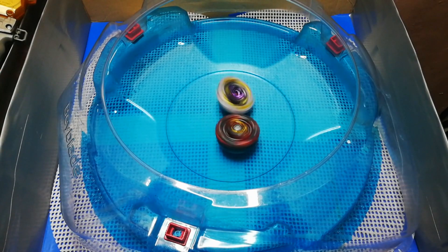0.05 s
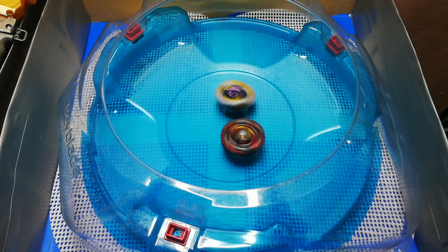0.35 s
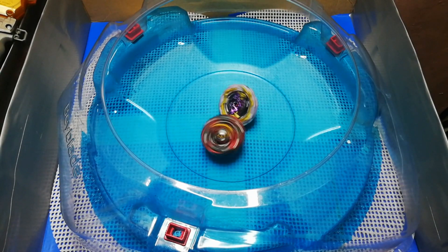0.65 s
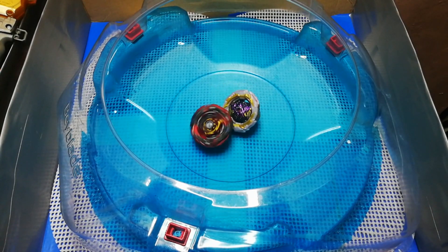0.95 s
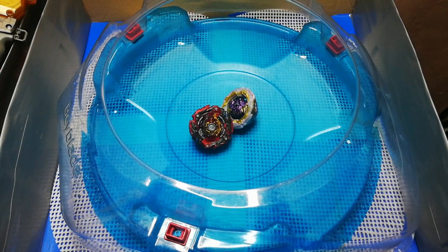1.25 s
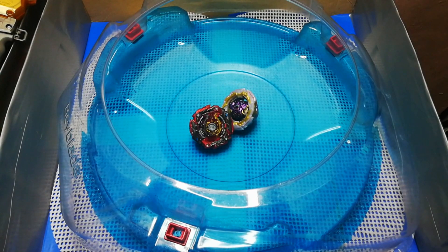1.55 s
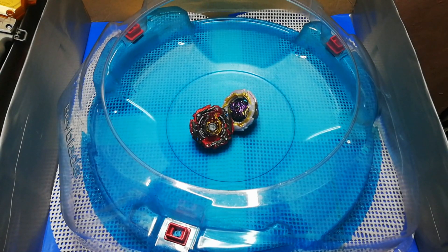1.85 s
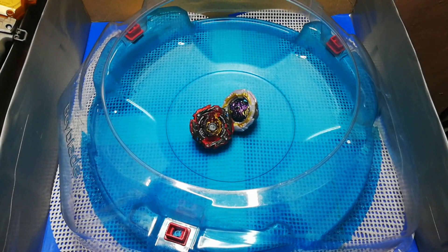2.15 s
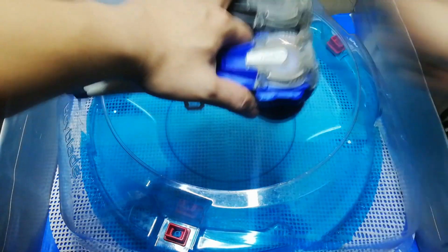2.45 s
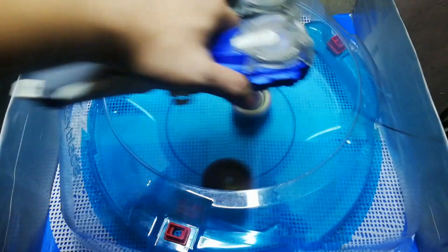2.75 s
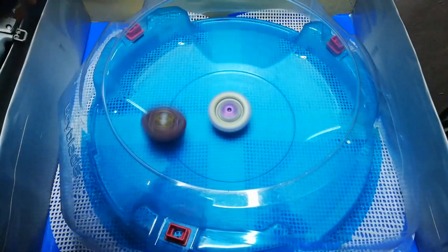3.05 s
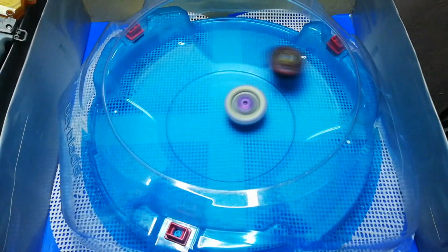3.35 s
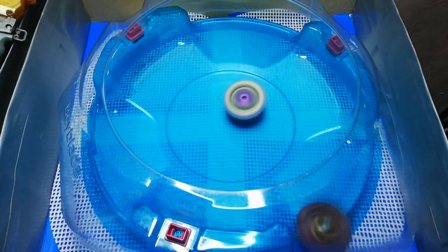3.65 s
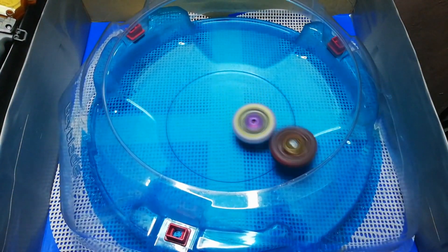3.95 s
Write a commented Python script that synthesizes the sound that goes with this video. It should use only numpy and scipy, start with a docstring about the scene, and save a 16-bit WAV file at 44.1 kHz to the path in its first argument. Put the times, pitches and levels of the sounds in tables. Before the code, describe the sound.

Spinning toy tops clack together close by in a plastic bowl for the first second, then die down to quiet room air. At about 2.4 seconds a ratchet launcher rips with a rising whine, snaps loudly at 2.6 and rewinds with a clicking rattle until 3.3. Fresh tops clatter in at 2.7 and whirr around, one slamming into the thin wall at about 3.5 and 3.7 seconds.

```python
"""Spinning tops in a plastic bowl

Two microphones close to a bowl that stands in a storage tub. Two tops clack together and die down.
A ratchet launcher is ripped and snaps at its stop; two fresh tops drop in while it rewinds and rattles.
One top whirrs round the bowl and slams twice into the thin wall. Behind it all, quiet room air."""
import sys
import numpy as np
from scipy import signal
from scipy.fft import rfft, irfft, next_fast_len
from scipy.io import wavfile
from scipy.ndimage import uniform_filter1d, map_coordinates

SR = 44100
rng = np.random.default_rng(int(sys.argv[2]) if len(sys.argv) > 2 else 0)


def put_to_file(sound):
    """Save the sound as 16-bit audio at rate SR, in the file named by the first command-line argument."""
    columns = np.atleast_2d(sound).T  # one column per channel
    safe = np.clip(columns, -1, 1)
    whole_steps = np.round(safe * 32767)
    wavfile.write(sys.argv[1], SR, whole_steps.astype(np.int16))


N = 176400

# The rims meet. Each row: start in seconds, level in dB, scrape t60 in seconds, bowl thump in dB.
CLACKS = [(0.027, -28, 0.026, -36.5), (.111, -15, 0.0084, -41.5), (.299, -32.5, 0.098, -40),
          (.3075, -29, 0.07, -42), (0.314, -23.5, .04, -27.5), (0.5525, -40, 0.019, -39),
          (0.581, -24, 0.034, -39), (.586, -22.5, 0.032, -24.5), (0.719, -42, .021, -47),
          (0.729, -26.5, .012, -31), (0.84, -39.5, 0.027, -44), (0.8572, -23.5, 0.02, -35.5),
          (.868, -27, 0.02, -31), (0.904, -24, .024, -30.5), (1.08, -45, 0.027, -39.5),
          (1.504, -50.5, 0.0087, -52)]
# The launcher's plastic parts click.
# Each row: start in seconds, level in dB, t60 in seconds, treble tilt in dB an octave.
CASE_CLICKS = [(2.391, -26.5, 0.014, 3.5), (2.401, -25.5, 0.011, 3), (2.44, -17, 0.013, 1),
               (2.464, -18, 0.021, 8.5), (2.548, -12, 0.022, 0), (2.6484, -0.5, 0.013, -2),
               (2.7523, -18.5, 0.045, -3), (2.82, -19.5, 0.015, -1), (2.857, -26, .014, 3),
               (2.889, -16.5, 0.044, 0.5), (2.931, -20, 0.04, 0), (2.938, -19, 0.027, 6),
               (2.969, -22, 0.028, 7), (2.996, -22, 0.049, 4), (3.025, -18, 0.06, -1),
               (3.036, -10, 0.017, 4), (3.044, -12, .012, 0), (3.053, -8, 0.012, 5), (3.069, -14, .014, -1),
               (3.0974, -5, 0.014, 1), (3.1008, -5.5, 0.019, -1), (3.1319, -5.5, 0.013, 2),
               (3.135, -5, 0.016, 1.2), (3.19, -15.5, 0.018, -2.5), (3.2284, -9.5, 0.011, -0.5),
               (3.251, -24, 0.018, -5.5)]
# The ratchet on the pull and rewind. Each row: time in seconds, level in dB, teeth a second.
PULL = [(2.33, -69, 90), (2.338, -44.5, 130), (2.41, -40, 218), (2.435, -28.5, 251), (2.458, -35, 275),
        (2.505, -30, 477), (2.53, -18, 635), (2.56, -21.5, 850), (2.59, -15.5, 1360), (2.626, -17, 1700),
        (2.642, -21.5, 1820), (2.66, -22.5, 1120), (2.672, -64, 1400)]
REWIND = [(2.64, -70, 1650), (2.66, -31, 1560), (2.73, -32, 1550), (2.81, -36.5, 1650), (2.87, -32, 1450),
          (3.04, -24.5, 2250), (3.16, -34, 2480), (3.27, -35.5, 2640), (3.3, -35, 3700), (3.36, -76, 1900)]
# The launcher is lifted away to the left. Each row: time in seconds, left over right in dB.
LAUNCHER_PATH = [(2.46, -2), (2.65, -3.5), (3.15, 3.5)]
# Fresh tops hop on the floor; the circling top strikes the wall.
# Each row: start in seconds, level in dB, t60 in seconds, bowl thump in dB.
LANDINGS = [(2.696, -18, 0.025, -15.5), (2.704, -14, 0.052, -36), (2.721, -16, 0.02, -37),
            (2.751, -19, 0.08, -40), (2.838, -24, 0.011, -19.5), (2.888, -12.5, 0.023, -44),
            (2.907, -24.5, 0.037, -21), (3.034, -20, 0.031, -42)]
CRASHES = [(3.344, -18, 0.049, -20.5), (3.484, -11.5, 0.053, -22.5), (3.49, -6, 0.028, -28.5),
           (3.619, -20.5, 0.016, -29), (3.721, -28, 0.1, -26.5), (3.735, -9.5, 0.042, -31.5),
           (3.745, -8.5, 0.043, -35), (3.756, -8.5, 0.028, -32)]
# The tips run on the bowl. Each row: time in seconds, rumble in dB, hiss in dB.
ROLL = [(0, -61.5, -65), (1.15, -56.5, -67), (1.35, -66, -68.5), (2.68, -63.5, -82), (2.72, -41.5, -35.5),
        (2.95, -33.5, -30.5), (3.15, -46.5, -49.5), (3.3, -37, -40), (3.43, -31.5, -38.5),
        (3.66, -48.5, -39.5), (3.88, -44, -37.5), (3.97, -34, -45)]

# The colour of each part at the microphones. Each row: frequency in Hz, relative level in dB.
RIM_COLOUR = [(240, -5.5), (400, -27), (697, -15), (852, -5), (1560, -2), (2220, -9.5), (2600, -5.5),
              (4180, -6), (9610, 2.5), (13700, -12), (16000, -27)]
GEAR_COLOUR = [(180, -69), (300, -31.5), (856, -22), (1210, -18), (2280, -11.5), (2840, -0.5), (3290, -7.5),
               (5080, -8), (8220, -21.5), (9390, -13.5), (13300, -20.5), (16000, -42)]
WHINE_COLOUR = [(400, -50), (650, -31), (1200, -9.5), (1750, -14), (2300, -36)]  # the gears' tone, sounded by the case
SLACK_CORD_COLOUR = [(590, -45), (1000, -21), (1610, -8), (2300, 2), (3840, -14), (4900, 0.5), (7880, -14),
                     (9280, -1), (16000, -43)]
SPOOL_COLOUR = [(290, -12.5), (500, -11.5), (784, -6), (946, -14), (2190, -0.5), (4800, -0.5), (5390, -7),
                (9630, -3), (13400, -14), (16000, -28)]
CASE_COLOUR = [(240, -47), (676, -40), (1600, -13.5), (2050, -11), (3530, -4.5), (6950, -5), (11800, -9.5),
               (16000, -26)]
GRIP_COLOUR = [(30, -2), (110, -9), (700, -41)]
THUMP_COLOUR = [(25, -22), (60, -7), (90, -8.5), (116, 7), (145, -5), (205, 0), (260, -2), (380, -12),
                (550, -15.5), (900, -30.5), (2500, -78)]
FLOOR_COLOUR = [(60, -22), (150, -4), (400, -1.5), (800, -10.5), (1500, -3.5), (2200, -19), (5000, -25)]
WALL_COLOUR = [(120, -43), (200, -18), (387, -10.5), (548, -22), (671, -11), (930, -9.5), (1080, -2),
               (1400, -9), (1750, -6.5), (2560, -11), (2800, -17.5), (3250, -10), (4040, -15), (9230, -16),
               (16000, -32.5)]
RUMBLE_COLOUR = [(18, -43), (102, 11), (229, 4), (351, 0.5), (475, -18.5), (800, -13), (1100, -64)]
TIP_COLOUR = [(290, -40), (500, 3), (1160, 0), (1380, -1), (2610, -6), (9920, -9), (14200, -23),
              (16000, -36)]
AIR_COLOUR = [(15, -56), (25, -6.5), (92, -10), (123, 2.5), (149, -15), (734, -15), (1160, -13),
              (1740, -13.5), (2990, -25), (7710, -36), (16000, -47)]
# Peaks and dips in those colours. Each row: centre in Hz, width in Hz, gain in dB.
RIM_MODES = [(7700, 250, 2.5), (9700, 240, -6.5)]
GEAR_MODES = [(1130, 180, 1.7), (1760, 170, 8.3), (2842, 240, 4.3), (4990, 370, 5.7), (8550, 1400, 9.4)]
SLACK_CORD_MODES = [(5000, 500, 7)]
CASE_MODES = [(1680, 160, 3.6), (2830, 180, 6.6), (6830, 92, 7.8), (9230, 900, 6.9)]
FLOOR_MODES = [(204, 27, 14.8), (391, 24, 9.6), (490, 200, 5), (1173, 125, 10.8), (1580, 280, 8.9)]
# Parts that ring when struck. Each row: frequency in Hz, relative level in dB, t60 in seconds.
PLASTIC_PING = [(3064, -41.5, 0.083), (5650, -46.5, 0.059)]
METAL_RING = [(11700, -44, .15), (12450, -50, .35)]
CASE_RING = [(2830, -9.5, 0.051), (3060, -9.5, 0.054)]
BOWL_RING = [(118.7, -6.5, .2), (205.6, -12.5, 0.12)]  # lowest modes, sounded by clacks near the centre
# The wall's hollow modes. Each row: frequency in Hz, dB for the side slam, dB for the front slam.
WALL_RING = [(391, -25, -34), (695, -22, -45), (830, -23, -30), (1010, -36, -13.5), (1073, -16.5, -39),
             (1101, -27, -20), (1256, -34, -20), (1405, -38, -24), (1600, -24, -28), (1774, -34, -23),
             (1890, -23, -32)]

# The tub's echoes. Each row: frequency in Hz, t60 in seconds.
TUB_DECAY = [(100, 0.086), (300, 0.35), (1000, 0.29), (5000, 0.25), (13000, 0.17)]
# How alike the microphones sound. Each row: frequency in Hz, correlation from 0 to 1.
MIC_LIKENESS = [(60, 1), (280, 0.94), (520, 0.04), (1100, 0.29), (3000, 0.17), (8000, 0.035)]
# The balance of the pair. Each row: frequency in Hz, left over right in dB.
MIC_BALANCE = [(100, 0), (550, -0.5), (2000, -1.5), (4500, -0.5), (8000, -2), (12000, -10.5)]

HARD_DB, BRIGHTEN = -29, 0.28  # clacks tilt up by BRIGHTEN dB an octave for each dB over HARD_DB
PING_GROWTH = 0.24  # dB of ping for each dB of clack
METAL_RING_S, CORD_STOP_S, SIDE_SLAM_S, FRONT_SLAM_S = 0.868, 2.649, 3.489, 3.741
TOOTH_SCATTER_DB, TOOTH_JITTER = 2, 0.03
SLACK_HZ = 386  # tooth rate where the cord's soft rasp gives way to ringing gears
JOLT_DB, AIR_DB, WALL_T60_S = -26.5, -57, 0.14
TILT_PIVOT_HZ, CUTOFF_HZ = 6500, 15700


def clacking_tops():
    """The metal and plastic rims of the slowing tops clack and ping; one blow leaves the metal ringing."""
    rows = [(s, db, t60, 1, BRIGHTEN * (db - HARD_DB)) for s, db, t60, _ in CLACKS]
    blows = contacts(rows, wet_db=0, build_s=0.003, attack_s=0.0037, vary_db=1.5, grit_db=4)
    ping = ring([(s, PING_GROWTH * db) for s, db, _, _ in CLACKS], PLASTIC_PING, attack_s=0.002)
    metal = ring([(METAL_RING_S, 0)], METAL_RING, attack_s=0.001)
    return body(blows, RIM_COLOUR, RIM_MODES) + ping + metal


def cord_pull():
    """The cord spins the ratchet up: a soft rasp while slack, ringing and whining gears once taut."""
    db, rate = curves(PULL)
    teeth = gated_gain(db + 1.1 * wobble(130)) * ratchet(rate, rasp_db=4.5, tick_s=0.015)
    taut = 1 / (1 + (SLACK_HZ / rate) ** 6)
    phase = 2 * np.pi * np.cumsum(rate * (1 + TOOTH_JITTER * wobble(200))) / SR
    whine = sum(amp(along(WHINE_COLOUR, k * rate)) * np.sin(k * phase + 0.95 * wobble(600))
                for k in (1, 2))
    gears = body(taut * teeth, GEAR_COLOUR, GEAR_MODES)
    cord = body((1 - taut) * teeth, SLACK_CORD_COLOUR, SLACK_CORD_MODES)
    return gears + cord + taut * gated_gain(db) * whine


def spring_rewind():
    """The spring winds the spool back, buzzing unevenly over the ratchet."""
    db, rate = curves(REWIND)
    gain = gated_gain(db + 2.55 * wobble(130))
    teeth = ratchet(rate * np.exp(0.036 * wobble(40)), rasp_db=8, tick_s=0.01)
    return body(gain * teeth, SPOOL_COLOUR)


def ratchet(rate, rasp_db, tick_s):
    """A pawl ticks once a tooth and rasps up the next one."""
    travel = np.cumsum(rate * (1 + TOOTH_JITTER * wobble(120))) / SR
    tooth = travel.astype(int)
    strength = amp(TOOTH_SCATTER_DB * rng.standard_normal(N)[tooth])
    drops = np.diff(tooth, prepend=0) * np.sqrt(SR / rate) * strength
    tick = noise(512) * amp(-60 * np.arange(512) / SR / tick_s)
    tick /= np.linalg.norm(tick, axis=1, keepdims=True)
    ticks = signal.fftconvolve(drops[None], tick, axes=1)[:, :N]
    rasp = unit(noise() * strength * (travel % 1) ** 2)
    return unit(ticks + amp(rasp_db) * rasp)


def launcher():
    """Pull and rewind echo in the tub; the case clicks, and the cord's stop jolts and rings it."""
    running = cord_pull() + spring_rewind()
    rows = [(s, db, t60, np.interp(s, *np.transpose(LAUNCHER_PATH)), tilt)
            for s, db, t60, tilt in CASE_CLICKS]
    clicks = contacts(rows, wet_db=-7.5, build_s=0.0072, attack_s=0.0012, vary_db=2.2, grit_db=4)
    jolt = contacts([(CORD_STOP_S, JOLT_DB, 0.02, 0, 0)],
                    wet_db=-19, build_s=0.01, attack_s=0.001, vary_db=0.5)
    case = body(clicks, CASE_COLOUR, CASE_MODES) + ring([(CORD_STOP_S, 0)], CASE_RING, attack_s=0.001)
    return in_tub(running, wet_db=-6) + case + body(jolt, GRIP_COLOUR)


def floor_landings():
    """Fresh tops drop in and clatter on the bowl's hollow floor."""
    rows = [(s, db, t60, 0, 0) for s, db, t60, _ in LANDINGS]
    clatter = contacts(rows, wet_db=-4.5, build_s=0.0036, attack_s=0.0016, vary_db=2.7, grit_db=2)
    return body(clatter, FLOOR_COLOUR, FLOOR_MODES)


def wall_crashes():
    """A fast top crashes into the thin wall, a little to the right; two slams ring its modes."""
    rows = [(s, db, t60, -1.5, 0) for s, db, t60, _ in CRASHES]
    crashes = contacts(rows, wet_db=-3, build_s=0.0023, attack_s=0.0019, vary_db=1, grit_db=1.5)
    wall = body(crashes, WALL_COLOUR)
    for place, s in enumerate([SIDE_SLAM_S, FRONT_SLAM_S]):
        modes = [(hz, levels[place], WALL_T60_S) for hz, *levels in WALL_RING]
        wall += pan(-3) * ring([(s, 0)], modes, attack_s=0.0026)
    return wall


def bowl_thumps():
    """Every blow of a top thumps the bowl; the clacks also ring its lowest modes."""
    rows = [(s, db, 0.06, 0, 0) for s, _, _, db in CLACKS + LANDINGS + CRASHES]
    thumps = contacts(rows, wet_db=-3.5, build_s=0.0091, attack_s=0.0022, vary_db=1)
    boom = ring([(s, db) for s, _, _, db in CLACKS], BOWL_RING, attack_s=0.0016)
    return body(thumps, THUMP_COLOUR) + boom


def rolling_tips():
    """The tips rumble and hiss unevenly over the plastic."""
    rumble_db, hiss_db = curves(ROLL)
    rumble = body(noise() * amp(rumble_db + 1.17 * wobble(21.75)), RUMBLE_COLOUR)
    hiss = body(noise() * amp(hiss_db + 3.05 * wobble(50)), TIP_COLOUR)
    return rumble + hiss


def tub_tail(size):
    """The tub's echoes: noise that dies at its own rate in each band."""
    hz, lag, bands = signal.stft(noise(size), SR, nperseg=256)
    tail = signal.istft(bands * amp(-60 * lag / along(TUB_DECAY, hz)[:, None]), SR, nperseg=256)[1]
    return tail[:, :size] / np.linalg.norm(tail[0, :size])


def in_tub(x, wet_db):
    """A running sound with the tub's echoes."""
    return x + amp(wet_db) * signal.fftconvolve(x, tub_tail(SR // 2), axes=1)[:, :N]


def room_air():
    """The room's low, steady hush."""
    return amp(AIR_DB) * body(noise(), AIR_COLOUR)


def contacts(rows, wet_db, build_s, attack_s, vary_db, grit_db=0):
    """Gritty bursts, each with its own colour and tub echoes that swell over build_s.
    Each row: start in seconds, level in dB, t60 in seconds, left over right in dB, tilt in dB an octave.
    """
    size = SR // 4
    out, t = np.zeros((2, N + size)), np.arange(size) / SR
    knots = np.geomspace(200, 16000, num=40)
    for s, db, t60, side_db, tilt in rows:
        decay = amp(-60 * t / t60)
        echo = amp(wet_db) * np.linalg.norm(decay) * tub_tail(size) * (1 - np.exp(-t / build_s))
        grit = amp(grit_db * unit(uniform_filter1d(rng.standard_normal(size), size=32)))
        scrape = decay * (1 - np.exp(-t / attack_s)) * grit * noise(size)
        scrape *= np.linalg.norm(decay) / np.linalg.norm(scrape, axis=1, keepdims=True)
        colour_db = vary_db * rng.standard_normal(len(knots)) + tilt * np.log2(knots / TILT_PIVOT_HZ)
        burst = filtered(scrape * pan(side_db) + echo, lambda hz: amp(along(np.c_[knots, colour_db], hz)))
        out[:, round(s * SR):][:, :size] += amp(db) * burst
    return out[:, :N]


def ring(blows, modes, attack_s):
    """Dying sine modes, struck by each blow at its start in seconds and level in dB."""
    size = SR // 2
    out, t = np.zeros(N + size), np.arange(size) / SR
    tone = sum(amp(db - 60 * t / t60) * np.sin(2 * np.pi * hz * t) for hz, db, t60 in modes)
    tone *= 1 - np.exp(-t / attack_s)
    for s, db in blows:
        out[round(s * SR):][:size] += amp(db) * tone
    return out[:N]


def body(x, colour, modes=()):
    """x rung through a causal body of unit power gain."""
    hz = np.fft.rfftfreq(16384, 1 / SR)
    peaks_db = sum(db / (1 + (2 * (hz - centre) / width) ** 2) for centre, width, db in modes)
    cepstrum = irfft(np.log(unit(amp(along(colour, hz) + peaks_db)) + 1e-6))
    half = len(cepstrum) // 2
    fold = np.r_[1, np.full(half - 1, 2), 1, np.zeros(half - 1)]  # gives minimum phase
    impulse = irfft(np.exp(rfft(cepstrum * fold)))
    return signal.oaconvolve(x, impulse[None, :half], axes=1)[:, :N]


def noise(size=N):
    """White noise at two microphones, alike in the bass."""
    def mix(hz):
        angle = np.arccos(np.clip(along(MIC_LIKENESS, hz), -1, 1)) / 2
        return np.array([np.cos(angle), np.sin(angle)])
    mid, side = filtered(rng.standard_normal((2, size)), mix)
    return np.array([mid + side, mid - side])


def filtered(x, response):
    """x times a response of frequency."""
    size = 2 * next_fast_len(x.shape[-1] * 3 // 4)
    return irfft(rfft(x, size) * response(np.fft.rfftfreq(size, 1 / SR)), size)[..., :x.shape[-1]]


def wobble(rate):
    """A smooth random curve, rate knots a second."""
    return map_coordinates(rng.standard_normal(N // 100), [np.arange(N) * rate / SR], mode="wrap")


def curves(rows):
    """One value per sample for each column after the time."""
    times, *columns = np.transpose(rows)
    return [np.interp(np.arange(N) / SR, times, column) for column in columns]


def along(points, hz):
    """A table's value at hz, on a log frequency axis."""
    knots, values = np.transpose(points)
    return np.interp(np.log(hz + 1), np.log(knots + 1), values)


def pan(db):
    """Microphone gains for db of left over right."""
    return amp(np.array([[0.5], [-0.5]]) * db)


def gated_gain(db):
    """A dB curve as gain, silent unless above both its ends."""
    return amp(db) * (db > max(db[0], db[-1]))


def amp(db):
    """Decibels to gain."""
    return 10 ** (np.asarray(db) / 20)


def unit(x):
    """Scaled to rms 1."""
    return x / np.sqrt(np.mean(x ** 2) + 1e-20)


def scene():
    """Tops, launcher and bowl close by, the room's air behind."""
    return (clacking_tops() + launcher() + floor_landings() + wall_crashes() + bowl_thumps()
            + rolling_tips() + room_air())


def record(dry):
    """The right microphone hears more treble; peaks clip and the band ends steeply."""
    heard = filtered(dry, lambda hz: pan(along(MIC_BALANCE, hz)))
    return filtered(np.clip(heard, -1, 1), lambda hz: hz < CUTOFF_HZ)


dry = scene()
out = record(dry)
put_to_file(out)
```